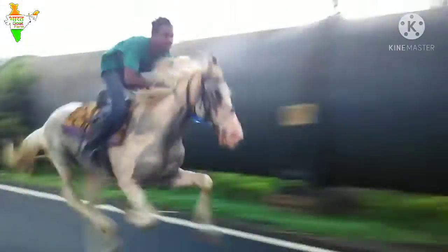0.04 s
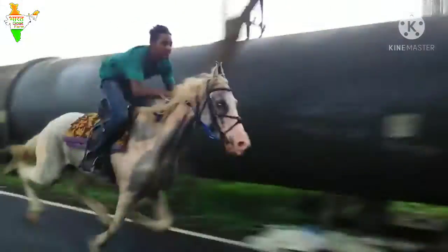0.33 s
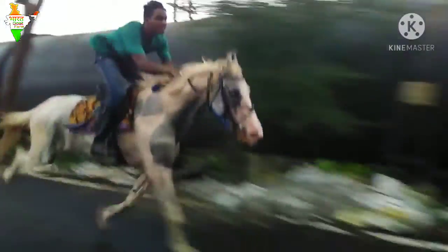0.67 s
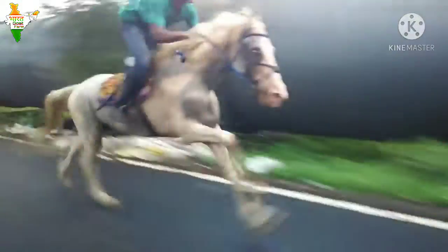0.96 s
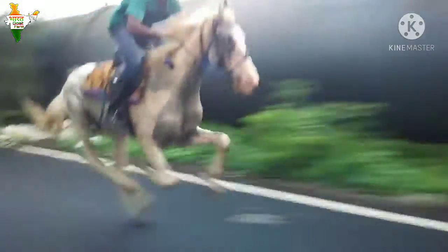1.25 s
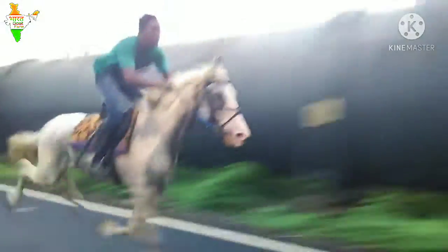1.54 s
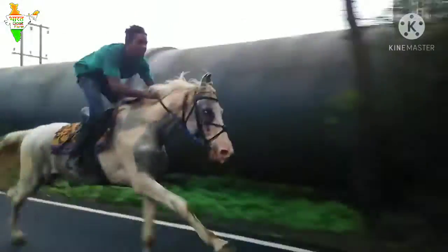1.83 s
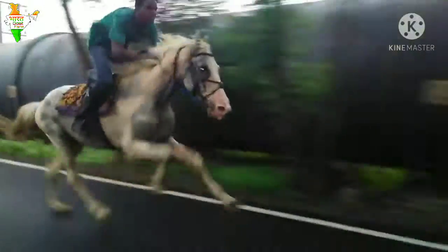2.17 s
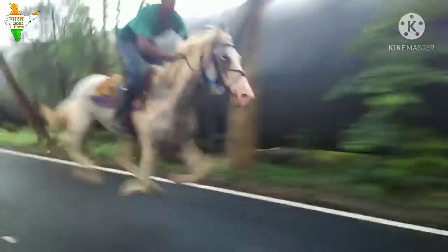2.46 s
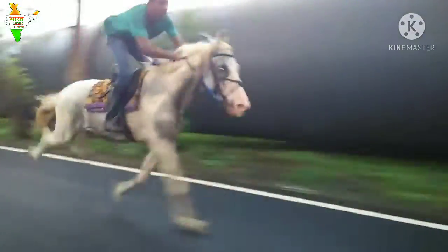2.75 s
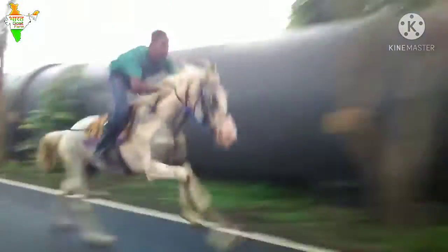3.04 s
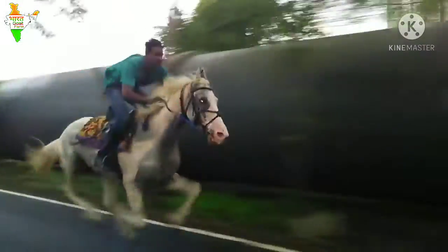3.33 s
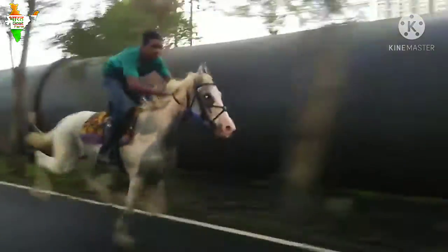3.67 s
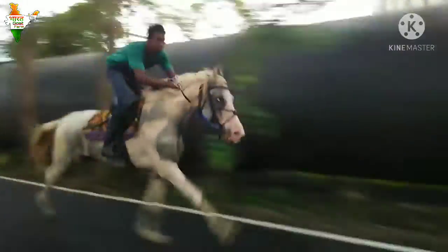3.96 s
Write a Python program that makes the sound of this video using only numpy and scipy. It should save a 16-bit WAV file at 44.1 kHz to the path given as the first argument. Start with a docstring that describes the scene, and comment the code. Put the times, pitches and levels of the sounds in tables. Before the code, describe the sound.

Sharp hoofbeats of a galloping horse keep a fast, even rhythm on pavement, with clicking shoes and scraping grit. The microphone travels beside it, buffeted throughout by low, gusty wind above a light hiss from the road.

```python
"""Horse galloping in wind

A horse gallops on a damp paved road beside a moving microphone, four footfalls to a stride.
Each shod hoof lands heel then toe and scuffs up grit; a big pipe along the verge echoes the hits.
Wind buffets both microphone ports over the hiss of the road and drives a limiter."""
import sys
import numpy as np
from scipy import signal
from scipy.fft import rfft, irfft, next_fast_len
from scipy.io import wavfile
from scipy.ndimage import uniform_filter1d, minimum_filter1d, map_coordinates

SR = 44100
rng = np.random.default_rng(int(sys.argv[2]) if len(sys.argv) > 2 else 0)


def dump_mix(stems):
    """Bounce the given channels to the path in sys.argv[1] as a 16-bit WAV at rate SR."""
    frames = np.atleast_2d(stems).T  # one column per channel
    limited = np.clip(frames, -1, 1)  # hard clip at full scale
    pcm = np.round(limited * 32767).astype(np.int16)
    wavfile.write(sys.argv[1], SR, pcm)


N = 176400

# Footfalls, levels relative within a column: start_s, clop_db, crack_db, click_db, toe_delay_ms, scuff_db
FOOTFALLS = [(0.2173, -28, -17.5, -19, 2.56, -26.5), (0.2779, -24.5, -20.5, -22, 1.57, -26.5),
             (0.3273, -39, -22.5, -8.5, 2.65, -21.5), (0.4174, -40, -28.5, -40, 3.4, -36),
             (0.6259, -19.5, -20.5, -14, 1.94, -27), (0.6861, -18, -29, -17, 2.2, -25.5),
             (0.741, -24, -30, -12, 3.2, -17.5), (1.0305, -15, -18.5, -15, 3.6, -27.5),
             (1.1004, -16.5, -22.5, -6.5, 1.32, -22), (1.172, -39, -25, -10, 1.5, -19.5),
             (1.253, -36, -33.5, -18.5, 1.2, -28.5), (1.4573, -17, -15.5, -10.5, 3.1, -30),
             (1.5247, -20, -25, -16, 1.9, -23.5), (1.589, -26, -30, -8, 2.14, -16.5),
             (1.6739, -26, -23.5, -23, 1.67, -30), (1.8754, -16, -20.5, -15.5, 2.4, -22.5),
             (1.942, -16.5, -21, -13, 1.3, -23.5), (2, -30, -24.5, -10, 3.2, -22),
             (2.0898, -24.5, -25, -17, 1.4, -28.5), (2.295, -21.5, -18, -16, 1.8, -21),
             (2.3627, -21, -23, -11.5, 1.4, -31.5), (2.4284, -21, -25, -5.5, 4.1, -26.5),
             (2.511, -23, -25, -16.5, 4.5, -30), (2.716, -23, -19, -13.5, 2.5, -33),
             (2.7854, -16.5, -17.5, -20.5, 1.5, -23.5), (2.833, -27, -24.5, -5.5, 2.96, -26.5),
             (2.923, -23.5, -32, -40, 3.04, -26.5), (3.1268, -19.5, -26.5, -14.5, 1.4, -40),
             (3.1962, -26, -29.5, -16.5, 4.4, -29), (3.261, -23, -27, -8, 3.7, -20),
             (3.3488, -28, -31, -22, 1.8, -31.5), (3.5545, -29, -19, -17.5, 2.3, -28),
             (3.625, -25.5, -42, -19, 1.8, -20), (3.6756, -31, -32, -6.5, 3.94, -24),
             (3.7647, -27, -32.5, -23, 3.9, -27.5), (3.9735, -22, -19, -13.5, 2.9, -27)]
# Steel shoe spectrum: freq_hz, gain_db
SHOE_SPECTRUM = [(1500, -21), (3000, -14.5), (5500, -2.5), (7200, -0.5), (8600, 5), (10500, -3),
                 (13000, -9), (16000, -19.5)]
KNOCK_CORR, CONTACT_CORR, DIFFUSE_CORR = 0.88, 0.66, 0.22  # correlation between the ports


def amp(db):
    return 10 ** (np.asarray(db) / 20)


def unit_rms(x):
    return x / np.sqrt(np.mean(x ** 2) + 1e-20)


def unit_energy(x):
    return x / np.linalg.norm(x, axis=-1, keepdims=True)


def db_at(spectrum, hz):
    """Interpolate (freq_hz, gain_db) rows on a log axis."""
    freq_hz, gain_db = np.transpose(spectrum)
    return np.interp(np.log(hz + 1), np.log(freq_hz + 1), gain_db)


def curve(rows):
    """Interpolate (time_s, value) rows per sample."""
    return np.interp(np.arange(N) / SR, *np.transpose(rows))


def wobble(rate_hz):
    """Smooth random curve, knots at rate_hz."""
    knots = rng.standard_normal(int(N * rate_hz / SR) + 4)
    return map_coordinates(knots, [np.arange(N) * rate_hz / SR])


def swells(rows):
    """Sum of Gaussian bells from (peak_s, level_db, sigma_s) rows."""
    t = np.arange(N) / SR
    return sum(amp(db) * np.exp(-.5 * ((t - peak_s) / sigma_s) ** 2) for peak_s, db, sigma_s in rows)


def filtered(x, response):
    """Apply response(hz) by FFT."""
    size = next_fast_len(N + SR // 4)
    return irfft(rfft(x, size) * response(np.fft.rfftfreq(size, 1 / SR)), size)[..., :N]


def noise(spectrum):
    """Coloured mono noise, rms 1."""
    return unit_rms(filtered(rng.standard_normal(N), lambda hz: amp(db_at(spectrum, hz))))


def coloured(x, spectrum, size=2048):
    """Apply a minimum-phase filter of energy 1."""
    cepstrum = irfft(np.log(amp(db_at(spectrum, np.fft.rfftfreq(size, 1 / SR)))))
    cepstrum[1:size // 2] *= 2
    cepstrum[size // 2 + 1:] = 0
    impulse = unit_energy(irfft(np.exp(rfft(cepstrum))))
    return signal.fftconvolve(x, impulse[None], axes=1)[:, :N]


def noise_pair(corr, size):
    """Two white noises with correlation corr."""
    mid, side = rng.standard_normal((2, size))
    angle = np.arccos(corr) / 2
    return np.cos(angle) * mid + np.sin(angle) * np.array([side, -side])


def burst(t60_s, corr, size=4096):
    """Decaying stereo noise, energy 1 per port."""
    return unit_energy(noise_pair(corr, size) * amp(-60 * np.arange(size) / SR / t60_s))


def add(track, start_s, sound):
    part = track[..., max(round(start_s * SR), 0):][..., :sound.shape[-1]]
    part += sound[..., :part.shape[-1]]


def buffeting(spectrum):
    """Wind at one port: large eddies thump, small ones flutter in quick bursts."""
    # Small eddies: freq_hz, gain_db
    flutter_spectrum = [(150, -16.5), (400, 8), (700, 0), (1200, -13.5), (2500, -32.5), (6000, -81)]
    lumps_db = 2.2 * wobble(rate_hz=22.03)
    body = unit_rms(amp(lumps_db) * noise(spectrum))
    flicker_db = 10 * np.tanh(wobble(rate_hz=160))
    flutter = unit_rms(amp(lumps_db + flicker_db) * noise(flutter_spectrum))
    return body + amp(-16) * flutter


def wind():
    """The exposed left port is buffeted throughout, over a deep rumble; the sheltered right gets gusts."""
    # Left buffeting: time_s, relative_db
    left_levels = [(0, -8), (.45, -8.5), (.8, -14), (1.0, -6.5), (1.5, -11.5), (1.75, -14.5), (2.25, -9),
                   (2.55, -11.5), (3.0, -7), (3.3, -11), (4, -9.5)]
    # Left buffeting: freq_hz, gain_db
    left_spectrum = [(25, -36), (70, -0.5), (130, 2.5), (230, -2.5), (350, -11), (550, -25.5),
                     (1000, -49.5), (2000, -48), (5000, -86)]
    # Deep rumble: time_s, relative_db
    rumble_levels = [(0, -10), (.3, -6.5), (.55, -13), (1.55, -11.5), (1.75, -4), (1.85, -20), (2.1, -1.5),
                     (2.17, -13.5), (2.8, -10), (3.3, -43), (3.9, -26)]
    # Deep rumble: freq_hz, gain_db
    rumble_spectrum = [(25, -34), (37, -16), (50, 10.5), (65, 12.5), (90, 12), (140, -1.5), (300, -47)]
    # Right gusts, about seven a second: peak_s, relative_db
    gust_peaks = [(0.099, -7), (.365, -18), (.5, -14.5), (.64, -13), (0.764, -9.5), (0.858, -5),
                  (.925, -7.5), (1.04, -10), (1.18, -18), (1.315, -13), (1.472, -6), (1.668, -2.5),
                  (1.82, -15), (1.96, -5.5), (2.091, -6.5), (2.21, -14), (2.35, -13.5), (2.56, -10.5),
                  (2.69, -11), (2.8, -13.5), (2.93, -16), (3.06, -13.5), (3.18, -12.5), (3.3, -15),
                  (3.57, -8), (3.74, -12), (3.87, -16)]
    # Right buffeting: freq_hz, gain_db
    right_spectrum = [(20, -23), (35, -5), (60, 1), (130, -3.5), (250, -7.5), (500, -16), (1000, -28),
                      (2000, -42), (5000, -52)]
    left_db, rumble_db, right_db = 5, 2.5, -1
    gust_sigma_s, lull_db = 0.027, -21
    left = amp(curve(left_levels) + left_db) * buffeting(left_spectrum) + slaps()
    left += amp(curve(rumble_levels) + rumble_db) * noise(rumble_spectrum)
    gusts = swells([(peak_s, db, gust_sigma_s) for peak_s, db in gust_peaks])
    right = amp(right_db) * np.hypot(amp(lull_db), gusts) * buffeting(right_spectrum)
    return np.array([left, right])


def road_hiss():
    """Tyres and passing air, swelling and fading, louder on the left."""
    # Hiss: time_s, relative_db
    levels = [(0, -30), (.17, -40), (.45, -36.5), (.58, -48.5), (.82, -31.5), (.99, -40.5), (1.25, -34),
              (1.8, -34), (2.25, -38.5), (2.55, -35), (3.04, -38), (3.35, -36.5), (3.52, -39), (3.75, -30),
              (3.9, -38.5)]
    # Hiss: freq_hz, gain_db
    spectrum = [(200, 14), (1000, -1.5), (2500, -8), (4000, -16.5), (6000, -11), (7400, -0.5), (8600, 4.5),
                (11000, -4.5), (15000, -8.5)]
    gain_db, pan_db = 2, 15
    sway = amp(curve(levels) + 0.25 * wobble(rate_hz=4.5) + 2.45 * wobble(rate_hz=110))
    return sway * np.array([amp(gain_db + side * pan_db) * noise(spectrum) for side in (.5, -.5)])


def hoof_ring(size=2048):
    """Damped hoof-wall modes, randomly detuned; their balance varies with where the hoof is struck."""
    # Hoof wall: pitch_hz, level_db, t60_s
    modes = [(1250, 1, 0.008), (1854, 3, 0.0083), (2424, 2, 0.0081), (3250, -4.5, 0.0031),
             (4010, -6, 0.0051)]
    t = np.arange(size) / SR
    tuning = np.exp(.1 * rng.standard_normal(len(modes)))
    swing_db = 2 * rng.standard_normal(len(modes))
    return sum((-1) ** k * amp(db + swing_db[k] - 60 * t / t60_s) * np.sin(2 * np.pi * hz * tuning[k] * t)
               for k, (hz, db, t60_s) in enumerate(modes))


def clop():
    """Hoof on road: a low knock with a longer tail."""
    # Knock: freq_hz, gain_db
    spectrum = [(100, 12), (350, -8), (850, 4.5), (1300, -2.5), (2100, -16), (5000, -21.5), (9000, -29)]
    knock = burst(t60_s=0.0087, corr=KNOCK_CORR)
    tail = amp(-3) * burst(t60_s=0.18, corr=DIFFUSE_CORR)
    return unit_energy(coloured(knock + tail, spectrum))


def crack(ring):
    """A sharp snap and a brief crunch of grit excite the hoof wall."""
    contact = burst(t60_s=0.0098, corr=CONTACT_CORR)
    contact[:, 0] += 1  # snap
    return unit_energy(signal.fftconvolve(contact, ring[None], axes=1))


def footfalls():
    """Heel, then toe: each contact knocks the road, cracks the hoof wall on grit and clicks the shoe."""
    clop_gain_db, crack_gain_db, click_gain_db = 30, 26.5, 19.5
    heel_to_toe = amp(-3)
    shares = np.array([heel_to_toe, 1]) / np.hypot(heel_to_toe, 1)
    clops, cracks, clicks = np.zeros((3, 2, N))
    for heel_s, clop_db, crack_db, click_db, toe_delay_ms, _ in FOOTFALLS:
        toe_s = heel_s + toe_delay_ms / 1000
        ring = hoof_ring()
        for start_s, share in zip((heel_s, toe_s), shares):
            add(clops, start_s, share * amp(clop_db + clop_gain_db) * clop())
            add(cracks, start_s, share * amp(crack_db + crack_gain_db) * crack(ring))
            click = burst(t60_s=.0062, corr=CONTACT_CORR)
            add(clicks, start_s, share * amp(click_db + click_gain_db) * click)
    return clops + cracks + coloured(clicks, SHOE_SPECTRUM)


def scuffs():
    """Each hoof slides on sand and throws small, ticking stones; a fine spray lingers."""
    # Grit: freq_hz, gain_db
    spectrum = [(300, -21), (900, 0), (2200, 3), (3300, -0.5), (5500, -1.5), (7200, 0), (8600, 5),
                (11000, -1), (15000, -12.5)]
    rise_s, slide_t60_s = 0.0054, 0.17
    spray_db, spray_t60_s = -8, 0.52
    stones_per_s, stones_db = 450, -3
    t = np.arange(SR // 2) / SR
    decay = amp(-60 * t / slide_t60_s) + amp(spray_db - 60 * t / spray_t60_s)
    envelope = (1 - np.exp(-t / rise_s)) * decay
    power = np.zeros(N)
    for start_s, *_, scuff_db in FOOTFALLS:
        add(power, start_s, (amp(scuff_db) * envelope) ** 2)
    sand = unit_rms(amp(4 * wobble(rate_hz=900)) * noise_pair(DIFFUSE_CORR, N))
    stones = unit_rms((rng.random(N) < stones_per_s / SR) * noise_pair(DIFFUSE_CORR, N))
    return coloured(np.sqrt(power) * unit_rms(sand + amp(stones_db) * stones), spectrum)


def pipe_echo(hits):
    """The pipe returns one delayed, slightly smeared reflection."""
    delay_s, level_db = .0185, -13
    smear = burst(t60_s=.016, corr=DIFFUSE_CORR)
    echo = np.zeros((2, N))
    add(echo, delay_s, amp(level_db) * signal.fftconvolve(hits, smear, axes=1))
    return echo


def rasps_and_clicks():
    """Brief bright shoe rasps and clicks after landing, plus two sharp echo clicks of hoof strikes."""
    # Rasps and clicks (echo clicks at 3.145 and 3.214 s): peak_s, level_db, sigma_s
    peaks = [(.351, -25, 0.0059), (.764, -15, 0.0047), (1.544, -16.5, 0.0013), (2.005, -13.5, 0.0017),
             (2.021, -17.5, 0.0043), (3.145, -14, 0.00078), (3.214, -15, 0.0011), (3.266, -12.5, 0.0028),
             (3.295, -25, 0.032)]
    return coloured(swells(peaks) * noise_pair(DIFFUSE_CORR, N), SHOE_SPECTRUM)


def slaps():
    """Short, ragged eddies hit the exposed port head-on."""
    # Slaps: peak_s, level_db
    peaks = [(.445, -0.5), (1.31, -9.5), (1.49, -11), (1.68, -2.5), (2.11, -7.5), (2.25, -10.5),
             (3.55, -12)]
    # Slap: freq_hz, gain_db
    spectrum = [(80, -24), (220, 5), (360, 11.5), (700, -1), (1400, -15), (2500, -41), (6000, -63)]
    sigma_s = 0.0075
    eddies = unit_rms(amp(5 * wobble(rate_hz=300)) * noise(spectrum))
    return swells([(peak_s, db, sigma_s) for peak_s, db in peaks]) * eddies


def at_ports(sound):
    """Hoof sound reaches the right port first; its treble is louder on the left."""
    # Port balance: freq_hz, left_minus_right_db
    pan = [(300, -2.5), (1500, -1.5), (3000, 1), (5000, 2.5), (8500, 10), (14000, 8.5)]
    right_lead_s = .00007
    side = np.array([[.5], [-.5]])

    def response(hz):
        return amp(side * db_at(pan, hz)) * np.exp(-2j * np.pi * hz * side * right_lead_s)

    return filtered(sound, response)


def scene():
    """Horse, wind and road at the two ports."""
    hits = footfalls()
    horse = at_ports(hits + scuffs() + rasps_and_clicks() + pipe_echo(hits))
    return horse + wind() + road_hiss()


def record(dry):
    """Fast bass-driven limiter that also ducks the treble a little, then soft clip and low-pass."""
    split_hz, top_hz = 1130, 15300
    ceiling, hold_s, treble_exponent = 1.04, 0.0056, 0.32
    bass = filtered(dry, lambda hz: 1 / (1 + (hz / split_hz) ** 2))
    hold_samples = int(hold_s * SR)
    needed_gain = np.minimum(1, ceiling / (np.abs(bass) + 1e-9))
    held_gain = minimum_filter1d(needed_gain, hold_samples, axis=1)
    gain = uniform_filter1d(held_gain, hold_samples, axis=1)
    limited = bass * gain + (dry - bass) * gain ** treble_exponent
    clipped = limited / (1 + np.abs(limited) ** 16) ** (1 / 16)
    return filtered(clipped, lambda hz: 1 / np.sqrt(1 + (hz / top_hz) ** 160))


dry = scene()
out = record(dry)
dump_mix(out)
```